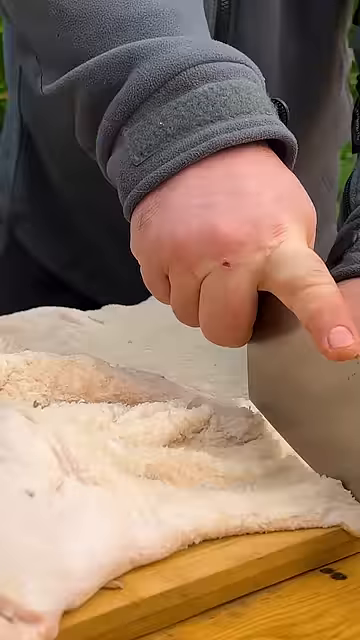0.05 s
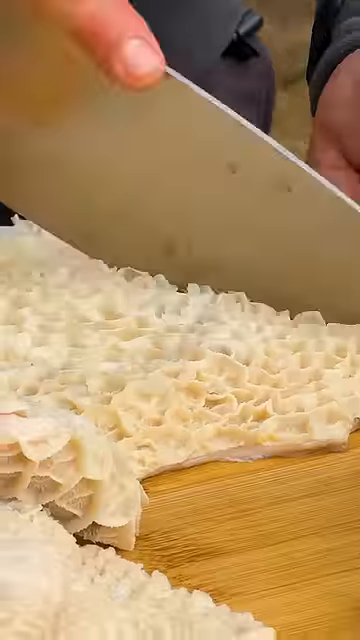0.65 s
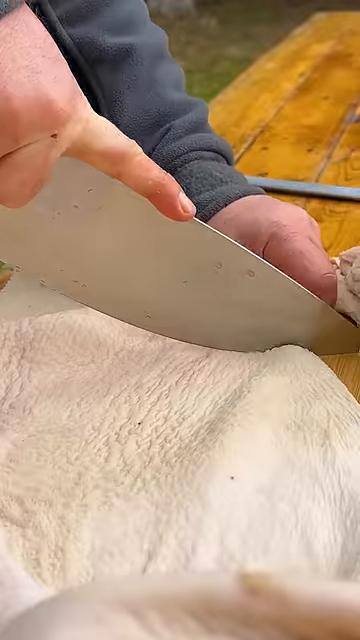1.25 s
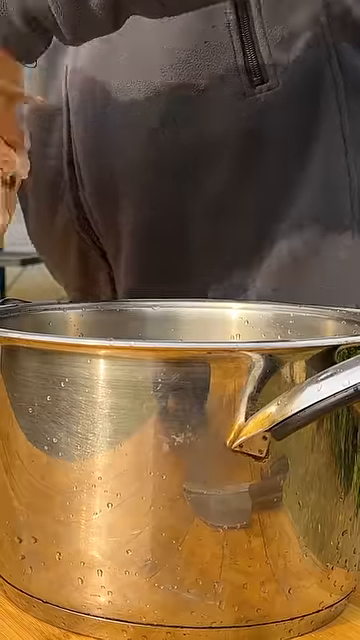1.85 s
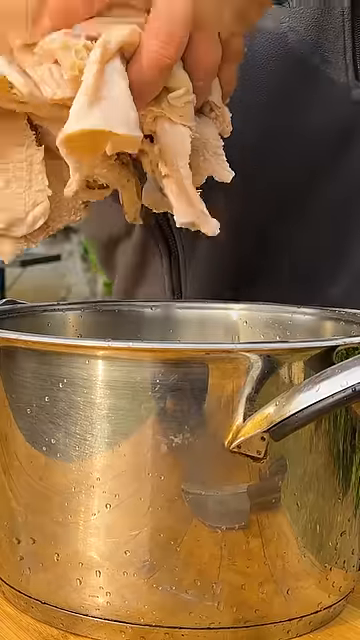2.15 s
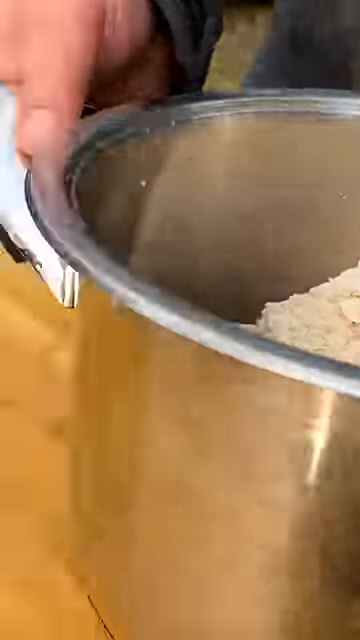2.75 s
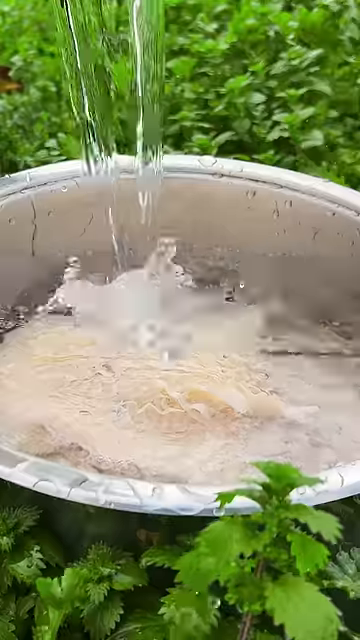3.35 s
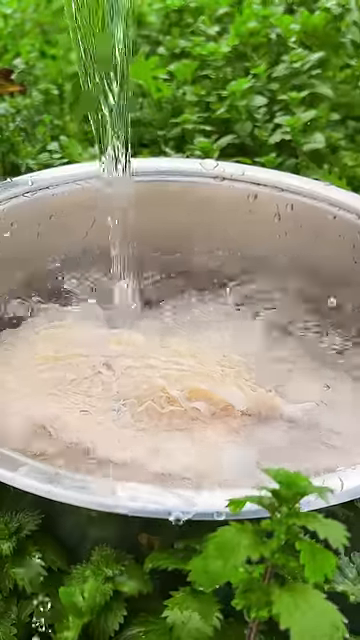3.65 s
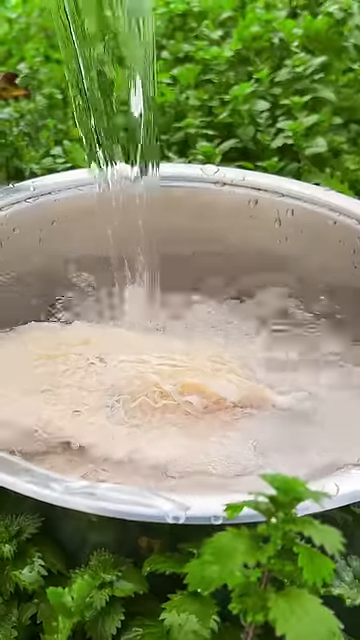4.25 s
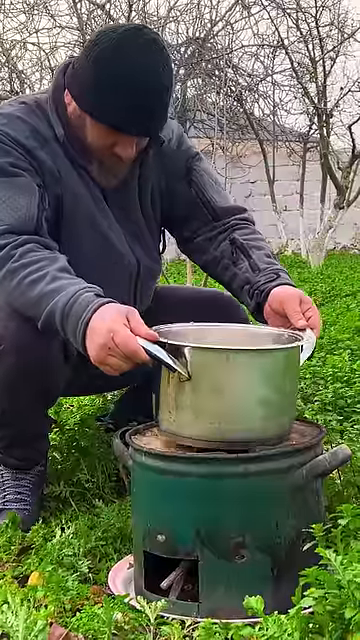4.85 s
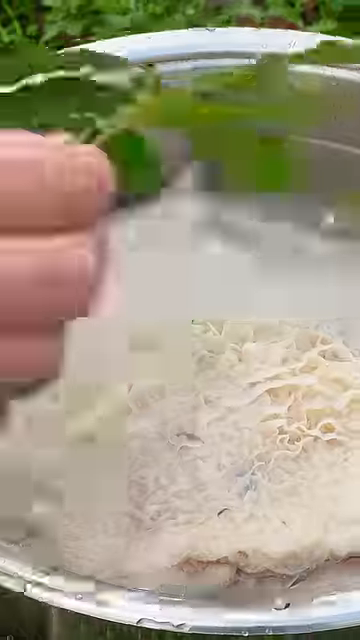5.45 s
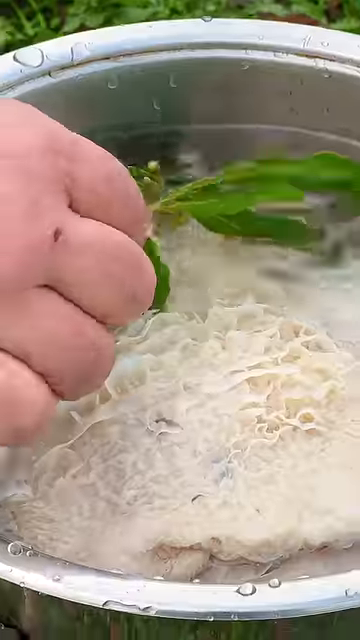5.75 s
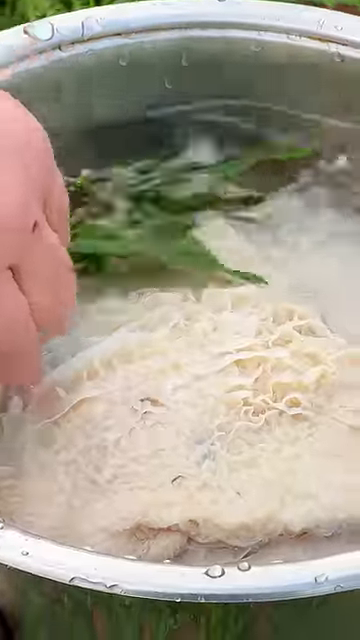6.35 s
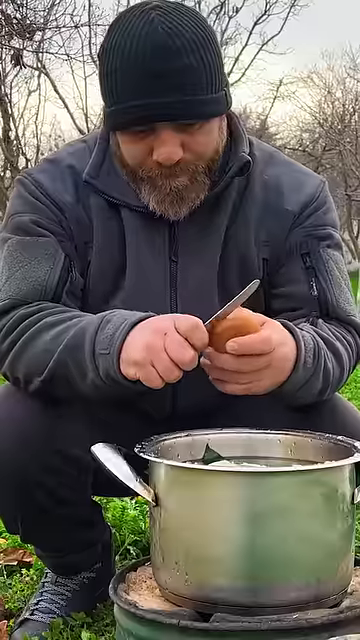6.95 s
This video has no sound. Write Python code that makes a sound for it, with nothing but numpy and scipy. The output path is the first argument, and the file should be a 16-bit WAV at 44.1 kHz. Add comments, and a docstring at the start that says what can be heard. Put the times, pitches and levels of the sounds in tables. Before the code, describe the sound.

From the start, a large knife saws through wet tripe close by, with rubbing strokes, small squelches and knocks on a wooden board; a strong dull thud comes at about 1.7 seconds. Around 2.3 seconds the wet heap slaps into a steel pot in a loud cluster of smacks and thumps. Near 2.7 seconds the pot scrapes off the table and rings faintly. From about 3.3 to 4.7 seconds water pours in, splashing, bubbling and gulping. The full pot bumps onto a stove three or four times between 4.9 and 5.3 seconds, then fizzes very softly. A light tap touches the rim at 6.4 seconds. From about 6.9 seconds a knife cracks dry onion skin in small snaps, with soft rubbing of hands, while a distant engine hums. A low rumble and soft garden air lie underneath throughout.

```python
"""Cooking tripe in a garden.

A big knife saws through wet tripe and knocks on a wooden board. The heap slaps into a steel pot, which
scrapes off the table and rings faintly. Water pours in with bubbles, spray and gulps of trapped air;
the pot bumps onto a stove, fizzes softly and takes a light tap on the rim. Then a knife cracks dry
onion skin while a far engine hums, all over the low rumble and soft air of the garden."""
import sys
import numpy as np
from scipy import signal
from scipy.fft import rfft, irfft, next_fast_len
from scipy.io import wavfile
from scipy.ndimage import uniform_filter1d

SR = 44100
rng = np.random.default_rng(int(sys.argv[2]) if len(sys.argv) > 2 else 0)


def store_wav(level_fs):
    """Save 16-bit WAV to argv[1]."""
    pcm = np.round(np.clip(np.atleast_2d(level_fs), -1, 1) * 32767)
    wavfile.write(sys.argv[1], SR, pcm.T.astype(np.int16))


N = 317961
TIME = np.arange(N) / SR

# modes of the pot's air and steel: pitch_hz, level_db, t60_s
POT_MODES = [(108, 1, .25), (205, 0, .13), (300, -8, .18), (410, 1, .06), (635, -9, .08), (824, -19, .18),
             (1071, -10, .06), (1685, -6, .06), (2089, -13, .3), (2216, -3, .42), (2863, -14, .1)]
# tone of the low rumble in table and garden: freq_hz, level_db
RUMBLE_TONE = [(18, -46), (30, -7), (65, -3.5), (105, -6), (124, -13), (200, -15.5), (231, -13), (260, -15),
               (340, -40), (570, -120)]
# tone of open air and of soft rustling: freq_hz, level_db
AIR_TONE = [(180, -23), (300, -9), (393, -11), (434, -17.5), (487, -16.5), (508, -15.5), (553, -15.5),
            (860, -14.5), (1880, -29), (2610, -36), (9000, -48.5), (11700, -83), (19800, -120)]


def from_db(db):
    """Decibels to amplitude."""
    return 10 ** (np.asarray(db) / 20)


def unit_rms(x):
    """Scale a signal to rms 1."""
    return x / np.sqrt(np.mean(x ** 2) + 1e-20)


def at_hz(points, hz):
    """Read a curve on a log-frequency axis."""
    freqs, values = np.transpose(points)
    return np.interp(np.log(hz), np.log(freqs), values)


def drift(per_s):
    """A random wander with a spread of about 1."""
    knots = rng.standard_normal(4096)
    return np.interp(TIME * per_s, np.arange(len(knots)), knots) * np.sqrt(3 / 2)


def white():
    """Two unrelated white noises."""
    return rng.standard_normal((2, N))


def grains(per_s, spread_db):
    """Random clicks of uneven size, with their own strength in each of two channels."""
    sizes = from_db(spread_db * np.minimum(rng.exponential(1, N), 4))
    return unit_rms(white() * sizes * (rng.random(N) < per_s / SR))


def mottle(x, depth_db, size=512):
    """Resonances shift as a contact moves: narrow patches of the spectrum swell and fade on their own."""
    cells = signal.stft(x, nperseg=size)[2]
    patches = uniform_filter1d(rng.standard_normal(cells.shape[-2:]), size=3, axis=0)
    patches = unit_rms(uniform_filter1d(patches, size=4, axis=1))
    gain = from_db(depth_db * np.clip(patches, -2, 2))
    return unit_rms(signal.istft(cells * gain, nperseg=size)[1][..., :N])


def colour(pair, tone, likeness=None, balance=None):
    """EQ two unrelated signals to a tone with steep skirts and spread them in stereo; mono rms 1."""
    # default stereo width: freq_hz, left_right_likeness
    usual_likeness = [(60, 0.99), (130, 0.89), (290, 0.68), (640, 0.13), (1410, 0.3), (3100, 0.23),
                      (6820, 0.08), (15000, 0.24)]
    # default panning: freq_hz, left_over_right_db
    usual_balance = [(60, 2.0), (130, 3), (290, 0), (640, 1), (1410, 1), (3100, 0), (6820, 1.5),
                     (15000, -16.5)]
    size = next_fast_len(N, True)
    hz = np.maximum(np.fft.rfftfreq(size, 1 / SR), 1)
    skirts = 1 / (1 + (tone[0][0] / hz) ** 8) / (1 + (hz / tone[-1][0]) ** 16)
    mid, side = rfft(pair, size) * from_db(at_hz(tone, hz)) * skirts
    alike = np.clip(at_hz(likeness or usual_likeness, hz), 0, .995)
    pan_db = at_hz(balance or usual_balance, hz)
    sides = np.array([[1], [-1]])
    stereo = np.sqrt(1 + alike) * mid + sides * np.sqrt(1 - alike) * side
    out = irfft(stereo * from_db(sides * pan_db / 2), size)[:, :N]
    return out / np.sqrt(np.mean(out.mean(0) ** 2) + 1e-20)


def band_noise(hz, octaves, width, order=2):
    """A short stereo noise round hz, its level evened out; long waves reach both ears alike."""
    edges = np.clip([hz / 2 ** (octaves / 2), hz * 2 ** (octaves / 2)], 20, .45 * SR)
    bandpass = signal.butter(order, edges, "band", fs=SR, output="sos")
    pair = signal.sosfilt(bandpass, rng.standard_normal((2, SR // 2)))[:, -(SR // 3):]
    power = uniform_filter1d(pair ** 2, max(int(3 * SR / hz), SR // 300))
    mid, side = pair / np.sqrt(power + 1e-20)
    return mid + width * min(hz / 500, 1) * side * np.array([[1], [-1]])


def add(out, start_s, sound):
    """Mix a short sound in at start_s."""
    at = max(round(start_s * SR), 0)
    out[:, at:at + sound.shape[-1]] += sound[..., :N - at]


def burst(decay_s, rise_s):
    """Envelope of a contact: a quick rise, a short hold, an exponential fall."""
    t = TIME[:SR // 3]
    return (1 - np.exp(-t / rise_s)) / np.cosh(t / decay_s)


def held(start_s, end_s, rise_s, fall_s):
    """Envelope of a gesture: swells up to its start, holds, dies away after its end."""
    away = np.maximum(start_s - TIME, 0) / rise_s + np.maximum(TIME - end_s, 0) / fall_s
    return np.exp(-np.minimum(away, 20))


def ring(x, modes):
    """A struck body rings: each mode answers a click with a decaying sine."""
    out = 0
    for hz, db, t60_s in modes:
        radius, angle = from_db(-60 / (t60_s * SR)), 2 * np.pi * hz / SR
        feedback = [1, -2 * radius * np.cos(angle), radius * radius]
        out += from_db(db) * signal.lfilter([0, np.sin(angle)], feedback, x + 1e-18)
    return out


def resound(x, modes, ring_db):
    """A contact together with the ring of the body that it touches."""
    return x + from_db(ring_db) * ring(x, modes)


def friction(rub_level, hiss_level, tone, hiss, slips_per_s, rough_db):
    """Dense tiny slips sound the body under a stroke; the wet surface hisses along."""
    slips = colour(mottle(grains(slips_per_s, 1.5), 3.6, size=1024), tone)
    return (rub_level * slips + hiss_level * hiss) * from_db(rough_db * drift(90))


def blows(rows, crackle, octaves, rise_s, width):
    """Soft wet contacts: a squashed thump with a crackle of liquid, its level set against the thump."""
    body, wetness = np.zeros((2, N)), np.zeros((1, N))
    for s, db, hz, decay_s, crackle_db, *_ in rows:
        shape = from_db(db) * burst(decay_s, rise_s)
        add(body, s, shape * band_noise(hz, octaves, width, order=3))
        add(wetness, s, shape * from_db(crackle_db))
    return body + wetness * crackle


def splats(rows, trim_db, octaves):
    """Short wet smacks, each round its own pitch."""
    out = np.zeros((2, N))
    for s, db, hz, decay_s in rows:
        shape = from_db(db + trim_db) * burst(decay_s, rise_s=.0015)
        add(out, s, shape * band_noise(hz, octaves, width=.6, order=3))
    return out


def squirts(contacts, trim_db):
    """Liquid spurts from under blade or heap at each contact, as strongly as it crackles."""
    centre_hz, decay_s = 5500, .0025
    spurts = [(s, db + crackle_db, centre_hz, decay_s) for s, db, _, _, crackle_db, *_ in contacts]
    return splats(spurts, trim_db, octaves=.9)


def glides(rows, settle, pan_db):
    """Heavily damped swings that swell and die; their pitch slides over `settle` times the swell."""
    out, t = np.zeros((2, N)), TIME[:SR // 3]
    for s, db, first_hz, last_hz, swell_s in rows:
        hz = last_hz + (first_hz - last_hz) * np.exp(-t / (settle * swell_s))
        shape = (t / swell_s * np.exp(1 - t / swell_s)) ** 2
        add(out, s, from_db(db) * shape * np.sin(2 * np.pi * np.cumsum(hz) / SR))
    return out * from_db([[pan_db / 2], [-pan_db / 2]])


def stroke_levels(part):
    """Envelopes of rubbing and of wet hiss over all strokes through one part of the tripe."""
    # knife strokes: start_s, end_s, rub_db, hiss_db, tripe_part
    strokes = [(.04, .07, -46, -72, "edge"), (.13, .33, -51.5, -60, "edge"), (.38, .46, -63, -65, "edge"),
               (.52, .55, -44, -57, "edge"), (.6, .69, -56, -66, "edge"),
               (.75, .93, -55.5, -77, "honeycomb"), (1.16, 1.22, -56, -74, "honeycomb"),
               (1.42, 1.5, -57, -71, "smooth"), (1.54, 1.89, -47.5, -66.5, "smooth"),
               (1.83, 1.87, -55, -63, "smooth")]
    levels = [from_db([[rub_db], [hiss_db]]) * held(start, end, rise_s=.06, fall_s=.065)
              for start, end, rub_db, hiss_db, where in strokes if where == part]
    return np.sqrt(sum(level ** 2 for level in levels))


def knife(hiss, crackle):
    """The blade saws through three parts of the tripe and knocks on the wooden board."""
    # tone of the rubbing in the edge, the honeycomb and the smooth part: freq_hz, level_db
    edge = [(88, -21), (150, -5.5), (173, 1), (201, -16.5), (475, 0), (540, -6), (583, -2), (629, -4),
            (867, -4), (1040, -18), (1390, 1), (1750, -16), (2220, -6), (2800, -24), (3600, -29),
            (4500, -17), (5400, -40), (7040, -120)]
    honeycomb = [(150, -46), (250, -54), (313, -3), (387, -20), (431, 1.5), (505, -8.5), (619, -5.5),
                 (711, -12), (791, -10.5), (1040, -16), (1230, -10), (1740, -27.5), (2590, -34.5),
                 (3200, -36), (4160, -57), (7040, -120)]
    smooth = [(150, -45), (250, -23), (303, -20), (367, -14.5), (422, -2), (619, 2.5), (719, -4.5),
              (938, -2), (1030, -6.5), (1900, -20), (2200, -28), (3200, -29.5), (4160, -48), (7040, -120)]
    # blade meets board: start_s, level_db, centre_hz, decay_s, crackle_db
    chops = [(0.0, -31.5, 260, 0.017, -43), (.028, -24.5, 430, .009, -25), (.05, -24, 340, .0073, -40),
             (.08, -33, 300, 0.035, -39), (.309, -44, 1500, .005, -19), (.517, -29.5, 694, .008, -15),
             (.537, -34, 770, .0065, -10), (.586, -47, 1650, 0.0069, -12), (.695, -53, 800, .008, -6),
             (.942, -38, 600, .0065, -10), (1.013, -60, 900, .003, -3), (1.157, -51.5, 334, 0.025, -47),
             (1.798, -32.5, 705, .0035, -25), (1.83, -49, 1400, .006, -12), (1.874, -52, 900, .004, -2),
             (1.92, -46, 420, .018, -26)]
    # modes of the board: pitch_hz, level_db, t60_s
    board_modes = [(160, 8.5, 0.14), (265, 8, 0.13), (401, -6.5, 0.053), (870, -4, .25), (1150, -24.5, 0.6)]
    cuts = (friction(*stroke_levels("edge"), edge, hiss, slips_per_s=4000, rough_db=.8)
            + friction(*stroke_levels("honeycomb"), honeycomb, hiss, slips_per_s=3000, rough_db=2.2)
            + friction(*stroke_levels("smooth"), smooth, hiss, slips_per_s=5000, rough_db=.8))
    knocks = blows(chops, crackle, octaves=1.57, rise_s=.0019, width=.63)
    return cuts + resound(knocks, board_modes, ring_db=-52) + squirts(chops, trim_db=-3.5)


def rasps():
    """Stick and slip gathers rubbing into a narrow band whose pitch wavers with the pressure."""
    # a sliding surface catches: start_s, level_db, pitch_hz, decay_s
    catches = [(0.0, -40, 1060, .06), (.17, -50, 1400, .11), (.31, -41, 2160, .005), (.46, -53, 800, .025),
               (.725, -56, 1350, .06), (.765, -46, 440, .032), (.85, -52, 490, .03), (.905, -53, 470, .014),
               (1.115, -57, 1100, .05), (1.235, -54, 600, .012), (1.475, -47, 820, .02),
               (1.6, -45, 600, .025), (1.9, -45, 880, .035), (2.16, -59, 1450, .06),
               (2.618, -49.5, 1270, .028), (2.717, -27, 1130, .009), (2.752, -35, 1100, .014),
               (4.78, -57, 1350, .027), (7.137, -51.5, 462, .011)]
    out, steps = np.zeros((2, N)), np.arange(SR // 3)
    for s, db, hz, decay_s in catches:
        travel = np.cumsum(1 + .05 * drift(35)[:len(steps)])   # the pitch wanders by about 5 %
        band = band_noise(hz, octaves=.27, width=.4)
        wavering = np.array([np.interp(travel, steps, ear) for ear in band])
        add(out, s, from_db(db) * burst(decay_s, rise_s=.0053) * wavering)
    return out


def table_and_stove_rumble():
    """The wooden table rumbles and knocks under the work; heavy loads set table and stove shuddering."""
    # the heaviest loads: start_s, level_db
    loads = [(0.0, -48), (2.305, -33), (2.37, -32), (2.78, -53), (4.89, -52), (5.06, -51)]
    # tone of the shudder: freq_hz, level_db
    shudder_tone = [(38, -14), (62, 1), (85, -4), (108, 2), (135, -9), (205, -8), (300, -16), (450, -24),
                    (900, -42)]
    # dull knocks through the table: start_s, level_db, first_hz, last_hz, swell_s
    thuds = [(.03, -41, 170, 110, .012), (.765, -43.5, 200, 90, .005), (1.028, -48, 245, 186, .0075),
             (1.18, -47, 109, 60, .025), (1.668, -22, 306, 69.4, .0077), (2.755, -38.5, 137, 80, .02),
             (2.788, -34, 260, 150, .005), (3.036, -45, 143, 115, .011)]
    work = held(0, 2.85, rise_s=.1, fall_s=.08) * from_db(3 * drift(9))   # hands and meat shift about
    load_level = sum(from_db(db) * held(s, s, rise_s=.01, fall_s=.09) for s, db in loads)
    shaking = white()
    rumble = from_db(-62) * work * colour(shaking, RUMBLE_TONE)
    shudder = load_level * colour(shaking, shudder_tone)
    rustle = from_db(-65.5) * work * colour(white(), AIR_TONE)
    return rumble + shudder + rustle + glides(thuds, settle=1.1, pan_db=3.5)


def garden():
    """A bed of low rumble, soft open air and a thin, quickly fluttering hiss at the top."""
    # tone of the thin hiss: freq_hz, level_db
    hiss_tone = [(7060, -49), (12000, -39.5), (12800, -10.5), (13400, -9), (14100, 2.5), (14800, -1),
                 (15600, -12)]
    flutter_hz = 60
    rumble = from_db(-60.5 + 1.2 * drift(7)) * colour(white(), RUMBLE_TONE)
    air = from_db(-72.5) * colour(white(), AIR_TONE)
    hiss = from_db(-77.5) * colour(white(), hiss_tone, balance=[(1000, 0), (10000, 0)])
    flutter = from_db(4.3 * np.cos(2 * np.pi * flutter_hz * TIME) - .9)
    return rumble + air + hiss * flutter


def heap_in_pot(hiss, crackle):
    """The soaked heap fizzes as it moves, slithers out of the hands and lands lump by lump."""
    # wet lumps hit the pot: start_s, level_db, centre_hz, decay_s, crackle_db, thud_db
    lumps = [(2.245, -40, 1500, .004, -7, -60), (2.254, -30, 305, .007, -18, -37),
             (2.268, -44, 400, .012, -7, -35), (2.294, -35, 330, .008, -10, -27),
             (2.309, -28.5, 1200, .007, -16, -42), (2.314, -26, 640, .007, -19, -28),
             (2.323, -22, 340, .007, -19, -32), (2.331, -18.5, 400, .0065, -21, -14),
             (2.334, -29, 1700, .0045, -5.5, -45), (2.354, -42, 550, .014, -2, -19),
             (2.387, -42, 900, .004, -3, -19.5), (2.392, -26, 540, .004, -28, -45),
             (2.399, -22, 400, .005, -22, -45), (2.407, -31, 230, .01, -30, -25),
             (2.439, -37, 520, .008, -14, -38)]
    soaked = from_db(-79) * held(2.05, 3.0, rise_s=.1, fall_s=.1)
    slither = from_db(-53) * held(2.26, 2.33, rise_s=.05, fall_s=.035)
    slaps = blows(lumps, crackle, octaves=1.1, rise_s=.00091, width=.6)
    # just after its smack, each lump bears down on the pot's floor with a sagging thud
    lag_s, first_hz, last_hz, swell_s = .011, 150, 72, .0063
    thuds = [(s + lag_s, thud_db, first_hz, last_hz, swell_s) for s, *_, thud_db in lumps]
    return ((slither + soaked) * hiss + resound(slaps, POT_MODES, ring_db=-52)
            + squirts(lumps, trim_db=-3) + glides(thuds, settle=1.1, pan_db=2.5))


def pot_pulled_away(hiss, crackle):
    """The pot scrapes harder as it gathers speed, judders off the table and rings once it is free."""
    # tone of the sliding base: freq_hz, level_db
    drag_tone = [(180, -37), (300, -9.5), (478, -10.5), (565, -5.5), (612, -14), (800, -3), (866, -18),
                 (965, -5), (1220, -8.5), (1750, -25), (1950, -20), (2600, -35.5), (3200, -29), (4160, -57),
                 (7040, -120)]
    # the base catches on grit and the table's edge: start_s, level_db, centre_hz, decay_s, crackle_db
    catches = [(2.598, -62, 1200, .012, 1), (2.624, -56, 800, .016, 3), (2.678, -52, 800, .01, -4),
               (2.762, -41, 700, .008, -6), (2.79, -35, 210, .012, -36), (2.815, -39, 180, .03, -36),
               (2.853, -54, 550, .006, -18)]
    # modes of the freely ringing wall: pitch_hz, level_db, t60_s
    wall_modes = [(587, -68, .7), (904, -64, 1.2), (921, -63, 1.1), (1303, -70, .7)]
    start_s, end_s, lift_s, growth_db_per_s = 2.69, 2.772, 2.78, 130
    sliding = held(start_s, end_s, rise_s=.018, fall_s=.006)
    rub_level = sliding * from_db(-37 + growth_db_per_s * np.minimum(TIME - end_s, 0))
    drag = friction(rub_level, sliding * from_db(-51.5), drag_tone, hiss, slips_per_s=1200, rough_db=2)
    scuffs = blows(catches, crackle, octaves=1.3, rise_s=.002, width=.6)
    release = np.zeros((2, N))
    add(release, lift_s, np.ones(1))
    return resound(drag + scuffs, POT_MODES, ring_db=-55) + ring(release, wall_modes)


def bubbles(count, start_s, end_s, low_hz, high_hz, cycles, climb):
    """Bubbles pinch off at random, swell for some cycles and ring out, rising slightly in pitch."""
    out, spread_db = np.zeros((2, N)), 16
    for when, pitch, size, place in rng.random((count, 4)):
        hz = low_hz * (high_hz / low_hz) ** pitch
        age = np.arange(int(8 * cycles * SR / hz)) * hz / (cycles * SR)   # 1 at the peak
        swing = age * np.exp(1 - age) * np.sin(2 * np.pi * cycles * (age + climb * age ** 2 / 2))
        mid_side = np.array([[1], [np.sqrt(2) * np.cos(2 * np.pi * place)]])
        add(out, start_s + when * (end_s - start_s), from_db(spread_db * size ** 3) * hz * swing * mid_side)
    return unit_rms(out) * np.sqrt((end_s - start_s) * SR / N)


def water():
    """A stream falls into the pot: bubbles in a wash of droplets, spray, low burble, splats and gulps."""
    # strength of the stream: time_s, level_db
    flow = [(3.08, -76), (3.37, -53.5), (3.45, -48), (3.85, -43.5), (4.33, -51), (4.48, -44), (4.6, -47),
            (4.7, -60), (4.85, -72)]
    # tones of the shallow splash, deep splash, fine spray and low burble: freq_hz, level_db
    shallow_tone = [(210, -55), (350, -43), (511, -49), (617, -14.5), (721, -15), (911, -6.5), (1050, -2),
                    (1720, -9.5), (2510, -6.5), (2930, -5), (3310, -26), (3740, -9.5), (5000, -17),
                    (6500, -40), (11000, -120)]
    deep_tone = [(210, -51), (350, -27), (453, -24), (573, -8.5), (692, -24.5), (928, 0), (1770, -5),
                 (2900, -4), (3300, -9), (3800, 0), (5800, -23.5), (7540, -57), (12800, -120)]
    spray_tone = [(2000, -29.5), (3400, -6.5), (3580, -4), (3740, -5.5), (5540, -12), (6140, -4),
                  (6460, -3), (7240, -12), (7610, -24), (7860, -5.5), (8320, -1.5), (11100, -20.5),
                  (12300, -41), (13900, -23), (15500, -15)]
    burble_tone = [(29, -40), (50, -7), (81, 0.5), (145, 7), (200, -1), (260, -15), (396, -25), (450, -20),
                   (580, -49.5), (990, -120)]
    # stereo width of the stream: freq_hz, left_right_likeness
    likeness = [(60, 0.53), (150, 0.85), (380, 0.69), (950, 0.97), (2380, 0.33), (5980, 0.18),
                (15000, 0.22)]
    # panning of the stream: freq_hz, left_over_right_db
    balance = [(60, 1.5), (110, 8), (200, 6), (380, 16), (700, -10.5), (1290, -2.5), (2380, -3.0),
               (4400, 1), (8120, -5), (15000, -7.5)]
    # the loudest splats: start_s, level_db, centre_hz, decay_s
    smacks = [(3.383, -32, 900, .0025), (3.409, -24, 1300, .005), (3.41, -24.5, 6000, .008),
              (3.414, -28.5, 2200, .016), (3.492, -31, 1250, .004), (3.625, -20.5, 2880, .002),
              (3.632, -32, 5000, .012), (3.782, -34, 850, .008), (3.878, -22, 5900, .0015),
              (3.97, -29, 6500, .002), (3.995, -31, 1010, .0025), (4.045, -31, 2500, .004),
              (4.226, -31, 4200, .004), (4.501, -27, 2360, .0025), (4.543, -29, 1300, .006),
              (4.56, -33, 750, .006), (4.602, -27, 3500, .0015), (4.632, -28.5, 1200, .005),
              (4.648, -32, 3000, .002), (4.718, -41, 2000, .005), (4.746, -24.5, 4740, .0016),
              (4.771, -38, 5000, .0015)]
    # trapped air pockets ring and rise in pitch: start_s, level_db, first_hz, last_hz, swell_s
    gulps = [(3.381, -40, 970, 1070, .0035), (3.488, -39, 1093, 1163, .0068),
             (3.578, -39, 1050, 1200, .005), (3.788, -31.5, 870, 1080, .0079),
             (4.135, -41, 950, 1150, .005), (4.168, -41, 1080, 1200, .004), (4.398, -41, 950, 1100, .004),
             (4.558, -36, 760, 1020, .005), (4.88, -32.5, 1150, 1240, .0024), (4.9, -48, 480, 1400, .017)]
    times, levels_db = np.transpose(flow)
    flow_db = np.interp(TIME, times, levels_db)
    span_s = times[0], times[-1]
    froth = bubbles(2400, *span_s, low_hz=600, high_hz=5600, cycles=2.7, climb=.012)
    froth += 1.15 * grains(6000, 2.4)
    mist = bubbles(3500, *span_s, low_hz=3200, high_hz=14500, cycles=5, climb=.008)
    mist += 1.1 * grains(5000, 3.3)
    # deeper water changes colour and throws less spray
    deep_from_s, deepening_s = 4.2, .23
    depth = np.clip((TIME - deep_from_s) / deepening_s, 0, 1)
    shallow = from_db(-5.5) * (1 - depth) * colour(froth, shallow_tone, likeness, balance)
    deep = from_db(-4.5) * depth * colour(froth, deep_tone, likeness, balance)
    spray = from_db(-6.5 - 4 * depth) * colour(mist, spray_tone, likeness, balance)
    stream = (shallow + deep + spray) * from_db(flow_db + 1.4 * drift(50))
    burble = from_db(-54.5 + .35 * (flow_db - levels_db.max())) * colour(white(), burble_tone)
    pouring = held(*span_s, rise_s=.06, fall_s=.015)
    drops = splats(smacks, trim_db=-10.5, octaves=1.05)
    return pouring * (stream + burble) + drops + glides(gulps, settle=1.5, pan_db=-1.5)


def pot_on_stove(crackle):
    """The full pot bumps down; each bump rocks the water with a sagging thump and a softer swing back."""
    # pot meets stove: start_s, level_db, centre_hz, decay_s, crackle_db, thump_db
    bumps = [(4.881, -45, 1000, .009, -17, -24.5), (5.055, -51, 480, .01, -29, -26),
             (5.16, -49, 560, .009, -23, -29.5), (5.275, -56, 400, .011, -32, -42),
             (5.68, -68, 300, .008, -25, -44)]
    # modes of the stove: pitch_hz, level_db, t60_s
    stove_modes = [(190, -3, .08), (282, 3, .12), (760, 0, .06), (1170, -15, .08)]
    contacts = blows(bumps, crackle, octaves=1.32, rise_s=.0017, width=.72)
    # the water rocks: start_s, level_db, first_hz, last_hz, swell_s
    thumps = [(s + .0025, db, 235, 135, .0048) for s, *_, db in bumps]
    swings = [(s + .02, db - 14, 235, 170, .012) for s, *_, db in bumps]
    return resound(contacts, stove_modes, ring_db=-47) + glides(thumps + swings, settle=1.5, pan_db=2.2)


def simmer():
    """Tiny bubbles fizz faintly in the heating pot, livelier just after it is set down."""
    # uneven swells of fizz: start_s, end_s, level_db
    swells = [(4.9, 5.5, -83), (5.68, 5.76, -84.5), (6.04, 6.13, -82), (6.19, 6.3, -82.5)]
    # tone of the fizz: freq_hz, level_db
    fizz_tone = [(1180, -48), (2000, -5), (2670, -5), (3750, -6), (4120, -10), (4480, -9), (7000, -20),
                 (9100, -52), (15400, -120)]
    set_down_s = swells[0][0]
    heating = sum(from_db(db) * held(start, end, rise_s=.025, fall_s=.04) for start, end, db in swells)
    slosh = from_db(-78) * held(set_down_s, set_down_s, rise_s=.03, fall_s=.25)
    level = (heating + slosh) * from_db(1.5 * drift(25))
    return level * colour(mottle(grains(3000, 2.7), 3.6, size=1024), fizz_tone)


def rim_tap():
    """A light touch on the rim leaves the steel ringing."""
    # the touch: start_s, level_db
    taps = [(6.407, -50)]
    # modes of the rim: pitch_hz, level_db, t60_s
    rim_modes = [(209, 1.5, .06), (900, 6.5, 0.013), (1190, -5.5, 0.0094), (3278, -26.5, 0.4),
                 (6040, -9, .008)]
    clicks = np.zeros((2, N))
    for s, db in taps:
        add(clicks, s, from_db([db]))
    return ring(clicks, rim_modes)


def far_engine():
    """A low throb, then a wavering firing tone, swell up as the engine gains a little speed."""
    # tone of the throb: freq_hz, level_db
    throb_tone = [(48, -3), (70, 3), (105, -1), (140, -16), (220, -27)]
    full_s, swell_s, throb_lead_s = 6.8, .17, .27
    pitch_hz, climb_hz_per_s = 116, 8
    firing_hz = (pitch_hz + climb_hz_per_s * (TIME - full_s)) * (1 + .025 * drift(25))
    firing = from_db(-43.5 + 2.5 * drift(16)) * np.sin(2 * np.pi * np.cumsum(firing_hz) / SR)
    firing *= held(full_s, TIME[-1], swell_s, fall_s=1)
    throb = from_db(-47) * colour(white(), throb_tone)
    throb *= held(full_s - throb_lead_s, TIME[-1], swell_s, fall_s=1)
    return (firing + throb) * from_db([[1.2], [-1.2]])   # a little to the left


def onion():
    """Dry skin tears in short runs of tiny snaps, over the soft rub of hands and sleeves."""
    # the skin splits: start_s, level_db, decay_s
    cracks = [(6.911, -39, 0.0029), (7.015, -40, 0.0036), (7.048, -37, 0.0028), (7.086, -46.5, 0.0062),
              (7.118, -50, 0.0056), (7.166, -48.5, 0.0079)]
    # tones of the snapping skin and of the rubbing hands: freq_hz, level_db
    skin_tone = [(530, -55), (900, -33), (1280, -1.5), (1820, -10), (2030, -1.5), (2920, -12), (3290, 5.5),
                 (3650, -12), (4620, -6), (7230, -12.5), (8330, -5), (12000, -29), (15000, -21)]
    rustle_tone = [(410, -38), (700, -4), (871, -26), (1250, -1.5), (2090, -10.5), (2490, -18),
                   (3680, -17.5), (8340, -22), (11000, -31), (14300, -55), (22000, -120)]
    tearing = np.zeros((1, N))
    for s, db, decay_s in cracks:
        add(tearing, s, from_db(db) * burst(decay_s, rise_s=.0017))
        add(tearing, s - .006, from_db(db - 10.5) * burst(.012, rise_s=.002))   # a softer, longer tear
    snaps = colour(mottle(grains(7000, 1.5), 3.4), skin_tone, balance=[(1000, .3), (10000, .28)])
    rubbing = from_db(-66.5) * held(6.92, 7.21, rise_s=.22, fall_s=.1)
    return tearing * snaps + rubbing * colour(white(), rustle_tone)


def scene():
    """Cutting, filling the pot, pouring, heating and peeling, one after another in the garden."""
    # tones of a wet surface's hiss and of crackling liquid: freq_hz, level_db
    hiss_tone = [(1530, 2), (2600, -0.5), (2830, -2), (3630, -6), (4260, 1), (5430, -5.5), (6740, -5),
                 (7690, -9), (8430, -0.5), (9870, -9), (11000, -19), (12100, -34.5), (12500, -40),
                 (16200, -59), (22000, -120)]
    crackle_tone = [(760, -43.5), (1300, -5), (1720, -4.5), (1830, -20), (1990, -3), (3310, -16),
                    (3590, -7), (4200, -12.5), (6690, -9.5), (7660, -24), (8320, -6), (12000, -37),
                    (15500, -37.5)]
    hiss = colour(mottle(grains(9000, .83), 2.5), hiss_tone)
    crackle = colour(mottle(grains(6500, 1.5), 2.1), crackle_tone)
    return (knife(hiss, crackle) + rasps() + heap_in_pot(hiss, crackle) + pot_pulled_away(hiss, crackle)
            + table_and_stove_rumble() + water() + pot_on_stove(crackle) + simmer() + rim_tap()
            + onion() + far_engine() + garden())


def record(dry):
    """The microphone loses the deepest bass; the top is cut steeply."""
    low_cut = signal.butter(2, 34, "high", fs=SR, output="sos")
    high_cut = signal.ellip(10, .2, 70, 15800, fs=SR, output="sos")
    return signal.sosfilt(high_cut, signal.sosfilt(low_cut, dry))


dry = scene()
out = record(dry)
store_wav(out)
```